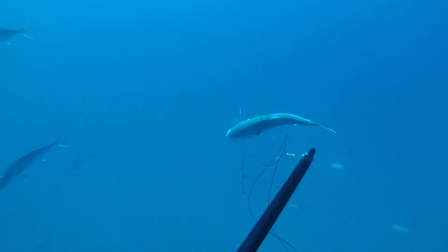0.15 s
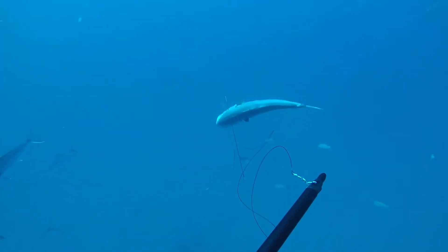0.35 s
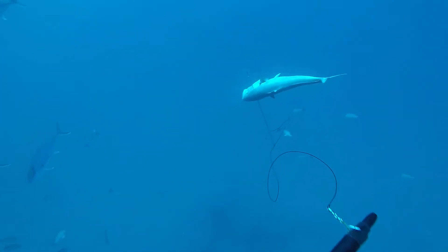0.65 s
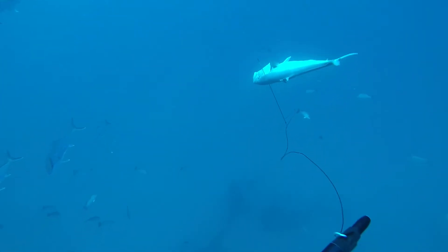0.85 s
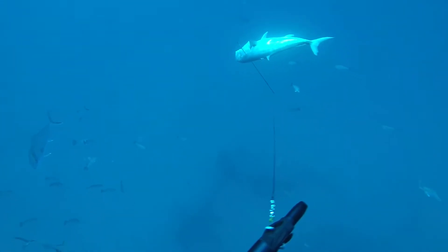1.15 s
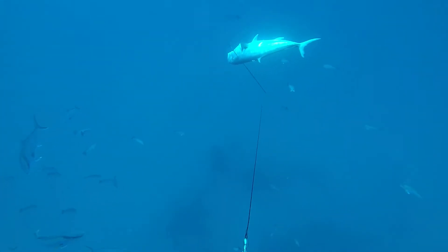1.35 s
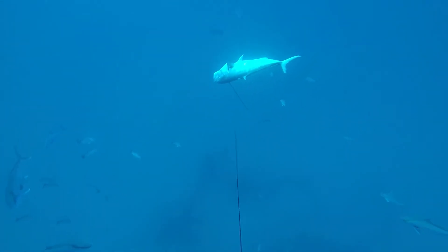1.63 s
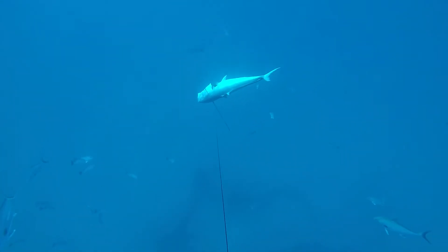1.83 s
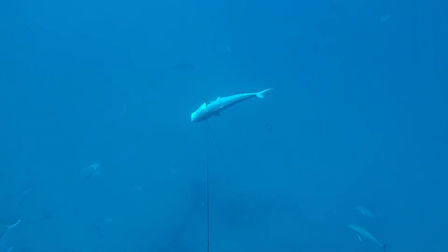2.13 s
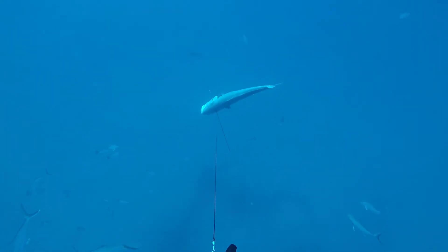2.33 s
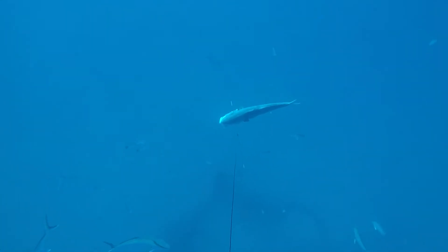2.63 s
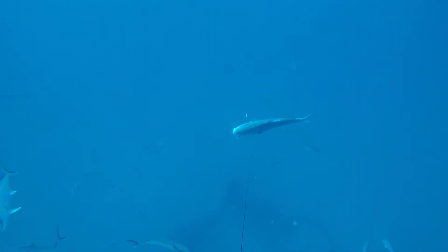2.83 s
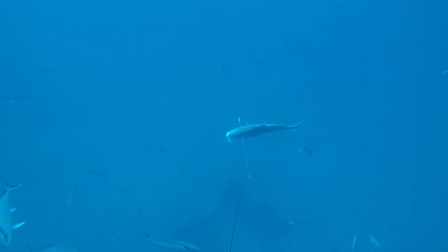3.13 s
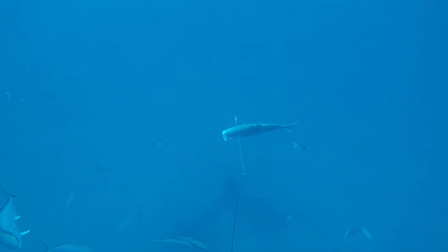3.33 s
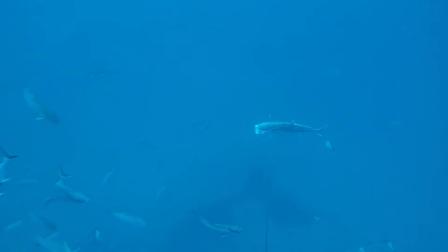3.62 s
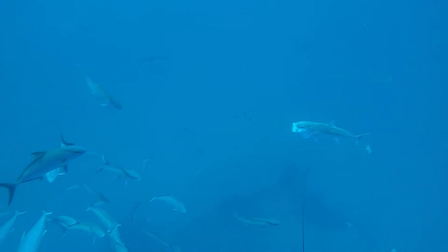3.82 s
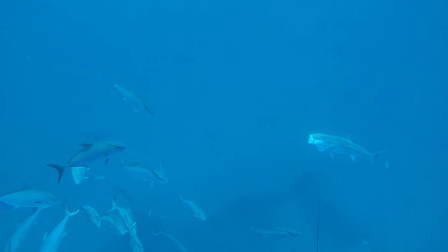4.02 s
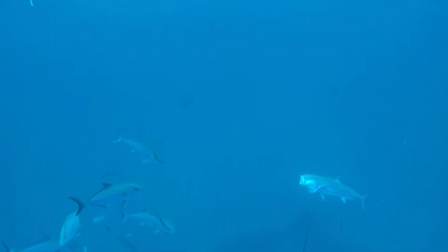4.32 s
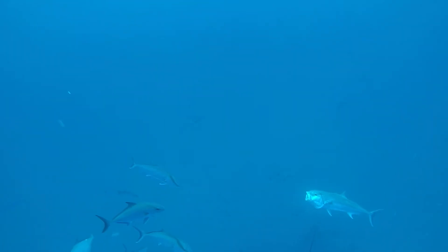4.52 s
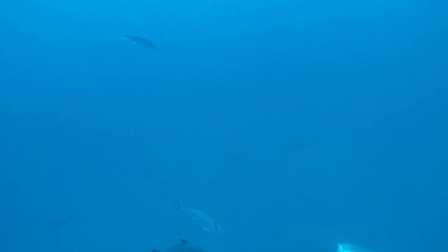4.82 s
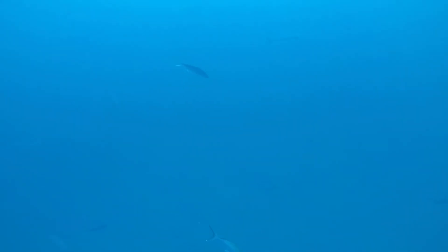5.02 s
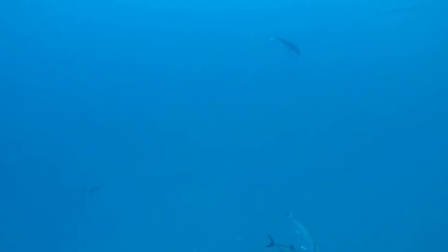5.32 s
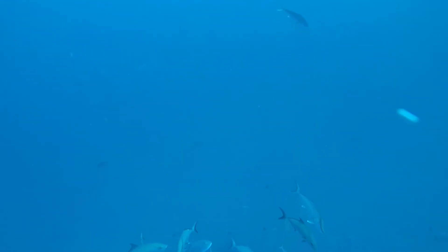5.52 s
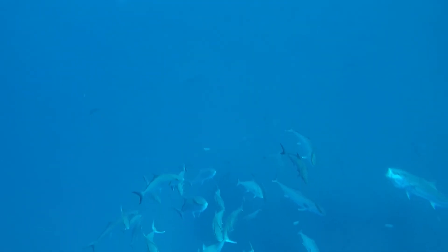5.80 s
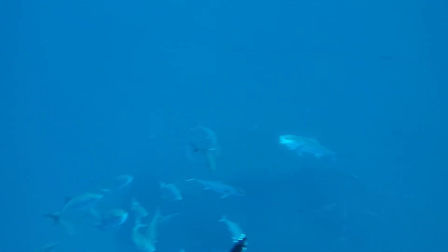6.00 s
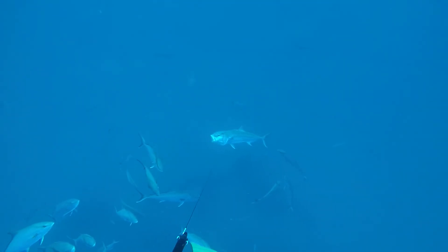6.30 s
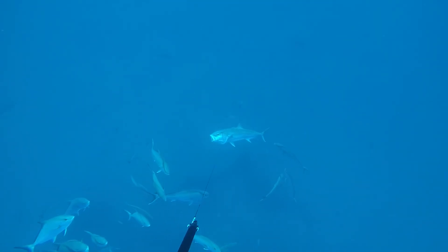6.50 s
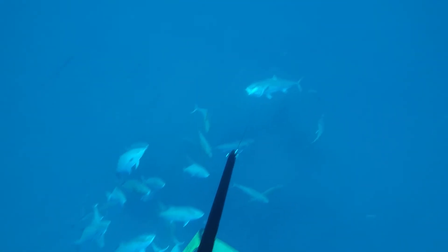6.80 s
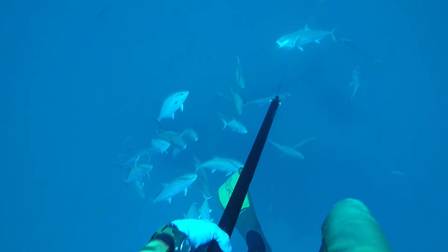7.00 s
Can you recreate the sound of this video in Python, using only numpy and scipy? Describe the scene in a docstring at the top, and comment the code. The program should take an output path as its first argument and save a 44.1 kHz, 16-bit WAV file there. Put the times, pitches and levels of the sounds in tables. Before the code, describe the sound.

Muffled open-sea sound: water hums and rumbles around a diver's sealed camera while shrimps snap, gear clacks, and close cracks ring briefly.

```python
"""Water streams past a camera's sealed housing on a swimming diver's head in open sea: it hums and rumbles.
Gusty noise drives the hum through air resonances. Noise with a fine crackle makes the sea's steady hiss.
Bubbles are rising blips; gear knocks by shaking the shell's modes, and thuds are short dull swings.
Far shrimps snap with an echo from the surface, and something cracks sharply close by.
Two microphones inside the housing hear all this with a lag and each with its own colour."""
import sys
import numpy as np
from scipy import signal
from scipy.fft import rfft, irfft
from scipy.io import wavfile
from scipy.ndimage import uniform_filter1d

SR = 44100
rng = np.random.default_rng(int(sys.argv[2]) if len(sys.argv) > 2 else 0)


def waveform_to_disk(signal):
    """Save audio, clipped to [-1, 1], as 16-bit WAV at the path in sys.argv[1]."""
    frames = np.transpose(np.atleast_2d(signal))
    scaled = np.clip(frames, -1, 1) * 32767
    samples = np.round(scaled).astype(np.int16)
    wavfile.write(sys.argv[1], SR, samples)


N = 315315

# The two microphones. Each row: frequency in Hz, relative hiss level on the right in dB,
# left minus right in dB.
MICROPHONES = [(146, -62.5, 7), (444, -67.5, -2.5), (614, -64, -2.5), (940, -59.5, -0.5), (1235, -54, -4.5),
               (1397, -69.5, 2), (1528, -59.5, -4.5), (2060, -66, -5.5), (2234, -81.5, 10.5),
               (2420, -63, -20), (2464, -74, 6), (3050, -67, -16), (3360, -79.5, 10), (3900, -73.5, -37),
               (4080, -79, 4), (4540, -77.5, -6), (5990, -74.5, 6), (6880, -80, 3), (7740, -74.5, -9),
               (8100, -81, -2), (10270, -84.5, -2), (12300, -94.5, 1.5), (13700, -99, 0), (15200, -120, 1)]
# How the left hiss differs from the right. Each row: frequency in Hz, left lead in radians,
# likeness from 0 to 1.
LEFT_TURN = [(400, -1.9, .1), (560, -1.3, .7), (780, -1.2, .75), (1000, .1, .96), (1200, .6, .94),
             (1380, .2, .2), (1600, .3, .6), (1850, .3, .4), (2000, -1.5, .4), (2170, -3.1, .1),
             (2400, -5.6, .65), (2900, -6.9, .65), (3150, -6, .7), (3600, -7.3, .55), (4000, -6, .65),
             (4350, -3.2, .15), (4600, -1.5, .4), (5100, .1, .72), (6300, 3.3, .7), (7100, 6.6, .25),
             (7800, 9.4, .5), (8300, 11.5, .1)]
# Water streaming past in surges. Each row: time in seconds, hum level in dB.
HUM_LEVEL = [(0.0, -53), (0.06, -45.5), (0.28, -54), (0.34, -35), (0.54, -40.5), (0.57, -29.5),
             (0.65, -40.5), (0.69, -33.5), (0.86, -52), (1.13, -44.5), (1.21, -36.5), (1.29, -42.5),
             (1.53, -39.5), (1.57, -26.5), (1.95, -30), (2.01, -50.5), (2.11, -55), (2.61, -33),
             (2.83, -50.5), (3.15, -30), (3.29, -41.5), (3.82, -29), (3.9, -38), (3.98, -25), (4.02, -43),
             (4.1, -53.5), (4.3, -29), (4.52, -39.5), (4.56, -28.5), (5.2, -49), (5.38, -71), (5.44, -29.5),
             (5.55, -73.5), (5.87, -19.5), (5.99, -22.5), (6.01, -28.5), (6.29, -49.5), (6.61, -33),
             (6.73, -67), (6.79, -50.5), (7.01, -63), (7.05, -35), (7.15, -74)]
# The lower hum. Each row: time in seconds, level in dB.
LOW_HUM_LEVEL = [(0.0, -48.5), (0.69, -36), (0.84, -57), (1.19, -23.5), (1.21, -36), (1.47, -42.5),
                 (1.53, -29), (1.61, -40.5), (1.67, -34), (1.71, -32), (1.93, -33), (2.11, -54),
                 (2.27, -40.5), (2.55, -41), (2.9, -43), (3.03, -28.5), (3.38, -38.5), (4.66, -30),
                 (5.4, -60), (5.44, -42), (5.5, -66), (5.93, -22.5), (6.13, -45), (6.59, -51), (6.71, -72),
                 (6.79, -46), (6.99, -70), (7.05, -58), (7.15, -67)]
# Slow pressure on the microphones. Each row: time in seconds, rumble level in dB.
RUMBLE_LEVEL = [(0.0, -45), (1.23, -52), (1.9, -56), (2.15, -60), (3.0, -64), (3.1, -45), (3.45, -39.5),
                (3.86, -45.5), (4.38, -26.5), (5.4, -44.5), (5.46, -29.5), (5.59, -44), (5.65, -28.5),
                (5.71, -33.5), (5.95, -23.5), (5.99, -38), (6.09, -21.5), (6.13, -32), (6.55, -28),
                (6.61, -29), (6.73, -39.5), (6.79, -26), (6.85, -35), (6.95, -29.5), (7.01, -36),
                (7.03, -26), (7.15, -29)]
# The sea's hiss. Each row: time in seconds, wash level (under 1330 Hz) in dB,
# fizz level (1330 to 3650 Hz) in dB.
HISS_LEVEL = [(0.0, -47, -52.5), (0.24, -45, -48.5), (0.4, -42.5, -47.5), (0.55, -43, -46),
              (0.8, -40.5, -45), (0.88, -40, -44), (0.96, -37, -40.5), (1.02, -41, -40.5), (1.1, -38, -45),
              (1.27, -39, -44.5), (1.53, -38, -46), (1.75, -39, -44), (2.61, -42, -45.5),
              (2.89, -43.5, -47), (3.17, -39.5, -45), (3.42, -44, -45.5), (3.78, -40.5, -45.5),
              (4.02, -42, -46), (4.56, -42.5, -45), (4.7, -40, -46), (4.92, -44.5, -45.5),
              (5.3, -44, -45.5), (5.69, -45, -45), (5.93, -41.5, -42), (6.11, -45.5, -46),
              (6.59, -42, -43.5), (6.885, -45, -48), (6.904, -46, -38.5), (6.925, -43.5, -45),
              (7.15, -46, -48)]
# The treble hiss swells on its own now and then, and a short scraping burst of hiss flares near 6.9 s. Each
# row: time in seconds, lift in dB.
TREBLE_LIFT = [(0, 0), (5.8, 0), (5.9, -1), (6.06, 2), (6.11, 3.5), (6.13, -0.5), (6.8, 0), (6.89, 0),
               (6.905, 8), (6.925, 5), (6.94, 1), (7.15, 1)]
# Bubbles slipping past the housing. Each row: start in seconds, level in dB, starting pitch in Hz,
# time to fade by 60 dB in seconds.
BUBBLES = [(0.151, -40, 420, 0.067), (1.815, -22, 483, 0.027), (2.054, -30.5, 780, 0.086),
           (2.834, -28, 393, 0.043), (4.607, -23, 382, 0.011), (6.08, -26, 420, 0.05),
           (6.434, -31.5, 447, 0.046), (6.834, -34, 380, 0.053)]
# Low, middle and high groups of housing shell modes. Each row of a group: typical frequency in Hz,
# typical level in dB, time to fade by 60 dB in seconds.
SHELL_MODES = [
    [(544, -15.5, 0.021), (761, 1, 0.027), (1070, -8, 0.009), (1225, -4.5, 0.013)],
    [(1360, 7, 0.0078), (1589, 5, 0.02), (1935, 1.5, 0.0079)],
    [(2370, 8, 0.0062), (3036, 12, 0.0095), (3790, 7.5, 0.0036), (4860, -1, 0.0014)],
]
# Gear scraping or tapping the shell. Each row: start in seconds, peak of the middle modes in dB,
# low modes relative to that in dB, high modes relative to that in dB.
KNOCKS = [(0.2108, -18, 7.5, -0.5), (0.2161, -16.5, -5, -22), (0.2265, -41, -12, -20),
          (0.2355, -19.5, -17, -8), (0.252, -30, -7, -20), (0.2575, -9, -28, -13), (0.2395, -26, -12, -12),
          (0.267, -28, -12, -20), (0.278, -28, -14, -20), (0.634, -34, 10, -10), (0.64, -25, -3, -2),
          (0.65, -31, 2, -15), (0.664, -36, -7, 7), (0.681, -36, -9, 6), (0.736, -35, -9, 8.5),
          (0.978, -27, -7, 1), (0.99, -27, -13, -11), (1.032, -15, 3.5, -10), (1.458, -21, 8.5, -25),
          (1.656, -38, 15, -20), (1.684, -18, -1, -11), (1.696, -23, -3, -16), (1.849, -24, 2, -28),
          (2.06, -26, 5.5, -5), (2.259, -28.5, 13.5, -3), (2.417, -27, -13, 2.5), (2.48, -21, 2, -20),
          (2.572, -27.5, 2, -31), (3.044, -10, -6.5, 0), (3.051, -21, -8, -4), (3.061, -21, -1, -18),
          (3.174, -13.5, -13, -39), (3.483, -21, -10, -30), (3.963, -23, 7.5, -26), (4.194, -22.5, -1, 3),
          (4.32, -24.5, -1, -28), (4.458, -24, -5, -39), (4.583, -20.5, -11, -45), (4.606, -23, 11, -2),
          (4.611, -19.5, -2, -1), (5.428, -24.5, 4.5, -38), (5.763, -16, 1.5, -47), (5.873, -28.5, 8, 0),
          (5.893, -25, 3, -1), (5.982, -35, -9, 8), (5.93, -23, -3, -22), (6.548, -31, -5, -13),
          (6.561, -26, 1, -7), (6.554, -27.5, 6, -18), (6.567, -20.5, -3, -13), (6.576, -24, -2, -20),
          (6.596, -25, -17, -10), (6.381, -18.5, -7, -8), (6.6007, -4, -2.5, -13.5),
          (6.6056, -19, -15, -20), (6.610, -27, -7, -24), (7.027, -30, -8, 3), (7.040, -34, -9, 5),
          (7.0463, -18, 11, -22), (7.052, -26, -14, -14), (7.0556, -13.5, 1, -13), (7.067, -28, 7, -4),
          (7.0757, -20.5, -2, -4)]
# Gear dragged across the shell, a rattle of many contacts. Each row: start in seconds, peak of the
# middle modes in dB, low and high modes relative to that in dB, length of the drag in seconds.
RATTLES = [(1.669, -20.5, 1.5, -15, .008), (5.197, -20.5, 0.5, -11, .007), (6.38, -18.5, -9, -9, .018),
           (6.584, -18, -18, -24, .004), (7.047, -11.5, -1, -13, .014)]
# Dull pressure thuds. Each row: time of the peak in seconds, right peak level in dB, settled pitch in Hz,
# rise in cycles of that pitch, left minus right in dB.
THUDS = [(0.215, -25.5, 237, 0.76, -22), (1.037, -15.5, 176, 0.35, -5), (1.144, -15.5, 173, 1.48, -27),
         (1.153, -28, 177, 1.14, -17), (1.18, -14.5, 182, 1.05, -24), (1.6604, -8.5, 163, 1.2, -8),
         (1.811, -19, 158, 1.27, -12), (3.969, -7, 161, .7, -1), (4.462, -4, 160, .7, -1.5),
         (5.435, -7, 156, .65, .1), (4.347, -15, 69, 0.34, 1), (4.689, -15.5, 53.6, 0.4, -18),
         (4.745, -22.5, 61.5, 0.3, 15), (5.636, -10.5, 63, 0.31, -1), (5.668, -14.5, 75, 0.32, 2),
         (5.769, -8, 212, 0.88, -9), (5.883, -39, 67, .36, -40), (6.386, -15, 234, 0.66, -5),
         (6.564, -11, 93, 0.49, 1.1), (6.607, -6.5, 69, 0.48, 3.5), (6.786, -10, 107, 0.23, -2.5),
         (6.808, -26, 133, 0.33, -7), (6.838, -14.5, 288, 0.52, -5), (6.935, -7, 43, 0.32, 4),
         (7.054, -16.5, 245, 1.17, -3), (7.081, -21, 59, 0.17, -7)]
# Shrimp snaps, and at 4.769 s the surface echo of the third crack, sounded like a snap. Each row: start in
# seconds, peak midway between the sides in dB, left minus right in dB, extra for the lowest ring in dB, extra
# for the highest rings in dB, surface echo relative to the snap in dB.
SNAPS = [(0.4685, -23.5, 8, -8, 10, -14), (0.516, -22.5, -3, -3, -5, -1), (0.6343, -14, -3.5, 3, -15, -19),
         (0.757, -31, 0, -9, 3, -7), (1.0331, -24.5, 1, 7, -11, -11), (1.255, -19, -2, -8, 12, -2),
         (1.3174, -26.5, 8, -14, -4, -10), (1.5742, -17.5, -6, -9, -14, -8), (1.684, -27, 3, -9, -9, -15),
         (1.883, -24.5, 6, -20, -14, -24), (1.9673, -31, 15, -12, -8, -19), (2.3525, -31, 1.1, -9, -8, -8),
         (2.4833, -9.5, 4.5, -4, 7.5, -8.5), (2.553, -17, -3, -14, 15, -3), (2.6938, -19, -2, -20, 12, -7),
         (2.833, -24.5, -1, 1, 1, -9), (2.8865, -14.5, -2, -16, 6, -9), (2.9012, -27, 0, -3, -6, -15),
         (2.9233, -12.5, -4.5, 5.5, 2.5, -8.5), (3.188, -30, -2, -9, 0, -11), (3.2, -16, 3, 7.5, 8, -23),
         (3.2645, -24.5, 0, -9, 0, -15), (3.256, -22.5, -5, 8, 12, -13), (3.2888, -20.5, -4.5, -6, -3, -9),
         (3.352, -25, -1, -11, 3, -15), (3.866, -23, -1, -6.5, -1.5, -2), (4.226, -27, -9, -9, 6, -10),
         (4.6052, -23, -5, 1.5, -8, -7), (4.648, -20.5, -2, -5, 7, -12), (4.769, -31, 0, -19, -14, -19),
         (5.2763, -18, -4, -8, 11, -6.5), (5.401, -8, -8, -8, -14, -4.5), (5.464, -25, 2, -21, -9, -7),
         (6.163, -29, -5, -13, 8, -16), (6.205, -24, 4, -11, 17, -11), (6.869, -23.5, -6, 6, -2, -14),
         (6.93, -18, -7, -12, -16, -17), (7.007, -21, -9, -5, -4, 6.5), (7.084, -21.5, -2, -5, 16, -16)]
# Rings of the microphone cavities. Each row: frequency in Hz, typical level in dB,
# time to fade by 60 dB in seconds.
CAVITY_RINGS = [(3170, 17.5, 0.0048), (6360, 21, 0.0015), (7270, 2, 0.0074), (8500, 10, 0.0027),
                (10650, 4.5, 0.0011), (12600, 6.5, 0.0028), (14700, 3.5, 0.0012)]
# Sharp cracks. Each row: start in seconds, settled ring pitch in Hz, time to fade by 60 dB in seconds,
# how far below that pitch it starts as a share, right and left ring level in dB, overtone relative
# to the ring in dB, tick frequency in Hz, tick upper limit in Hz, right and left tick level in dB.
CRACKS = [(4.7010, 1403, 0.033, 0.044, 1.5, -3, -14, 5420, 8400, -12.5, -6.5),
          (4.7307, 1906, 0.032, 0.23, 1.5, -5.5, -12, 3660, 5540, -15, -10),
          (4.7405, 1720, 0.019, 0.13, -3.5, -11, -9.5, 5900, 6860, -23, -14.5)]

LEFT_LAG_S = 22 / SR
HUM, LOW_HUM, HIGH_HUM = (288.6, 21.1), (151, 41), (446, 33)  # air modes: Hz, width in Hz
HIGH_HUM_DB = -22  # the weak third air mode, relative to the hum
TREBLE_DB = -8.5  # hiss over 3650 Hz relative to the fizz, before its own lift
CONTACT_S, CONTACTS_PER_S = 0.0029, 1500  # length of a touch; average contact rate in a rattle
LOW_LEAD = 0.96  # extra left lead of the low shell modes, radians
THUD_LEAD = -2.45  # left lead in radians: nearly opposed in the two microphones
START_DEPTH_M, ASCENT_M_S, SOUND_M_S = 17.6, .56, 1500
ECHO_PAN_DB, ECHO_TOP_HZ = 4.5, 8300  # left minus right of the echo from overhead; its upper limit
FORERUNNER_S, FORERUNNER_DB = 0.00189, -19  # faint tick as the claw shuts: time ahead, noise strength
OVERTONE_HZ, OVERTONE_S = 2930, 0.0021  # a rough upper ring of the cracking cavity; its decay time
TOP_HZ = 16400  # upper limit of the recorder


def undb(db):
    """Turn decibels into a plain factor."""
    return 10 ** (np.asarray(db) / 20)


def unit(x):
    """Scale to an average (RMS) strength of 1."""
    return x / np.sqrt(np.mean(x ** 2))


def peak(x):
    """Scale so the largest swing is 1."""
    return x / np.abs(x).max()


def band(x, hz, width):
    """Two-pole resonance: strengthen one pitch, width in Hz."""
    return signal.lfilter(*signal.iirpeak(hz, hz / width, SR), x)


def sieve(x, order, hz, kind):
    """Butterworth filter: 'low', 'high' or 'band' says what passes."""
    return signal.sosfilt(signal.butter(order, hz, kind, fs=SR, output="sos"), x)


def ring(x, modes):
    """Sum of decaying modes struck by x."""
    out = 0
    for hz, db, t60 in modes:
        pole = np.exp(2j * np.pi * hz / SR - np.log(1000) / (t60 * SR))
        out = out + undb(db) * signal.lfilter([1], [1, -pole], x).imag
    return out


def walk(rate):
    """Random levels held for 1 / rate seconds and smoothed twice, with an RMS of 1."""
    hold = int(SR / rate)
    steps = np.repeat(rng.standard_normal(N // hold + 1), hold)
    smooth = uniform_filter1d(uniform_filter1d(steps, hold), hold)
    return unit(smooth[:N])


def add(out, s, x):
    """Mix x into out from time s."""
    i = int(s * SR)
    out[..., i:i + x.shape[-1]] += x[..., :N - i]


def clock(seconds):
    """Time in seconds at every sample of a short sound."""
    return np.arange(int(seconds * SR)) / SR


def frequencies():
    """Every frequency of the full-length spectrum, in Hz."""
    return np.arange(N // 2 + 1) * SR / N


def curves(table):
    """Columns of a time table at every sample."""
    s, *columns = np.transpose(table)
    return [np.interp(np.arange(N) / SR, s, column) for column in columns]


def microphone_colour():
    """Hiss level, left minus right, left lead and likeness at every frequency."""
    at = np.log(frequencies() + 1)
    colour = []
    for table in (MICROPHONES, LEFT_TURN):
        hz, *columns = np.transpose(table)
        colour += [np.interp(at, np.log(hz), column) for column in columns]
    return colour


def pair(x, lead, left_db, alike=1, other=0):
    """Left and right: the left is late, turned in phase and partly unrelated."""
    alike = np.clip(alike, 0, 1)
    left = alike * rfft(x) + np.sqrt(1 - alike ** 2) * rfft(other + 0 * x)
    turn = np.exp(1j * (lead - 2 * np.pi * frequencies() * LEFT_LAG_S))
    return np.array([irfft(left * undb(left_db) * turn, N), x])


def steady(x, share):
    """Partly even out the slow swings in strength, so the hum sounds steadier."""
    power = uniform_filter1d(x ** 2, int(.09 * SR)) + 1e-12
    return unit(x / power ** (share / 2))


def eddies(rate, patchy_db):
    """Swirling water as noise whose strength wanders in gusts."""
    return rng.standard_normal(N) * undb(patchy_db * walk(rate))


def hum(hum_db):
    """The main air mode, evened out, plus a weak higher one."""
    main = steady(band(band(eddies(25, 2.9), *HUM), HUM[0], 62.6), 0.81)
    high = unit(band(band(eddies(25, 5.3), *HIGH_HUM), *HIGH_HUM))
    return (main + undb(HIGH_HUM_DB) * high) * undb(hum_db)


def low_hum(low_db):
    """The lowest air mode, cut steeply at the bottom."""
    tone = band(band(eddies(25, 2.5), *LOW_HUM), 227.0, 95)
    return unit(sieve(tone, 10, 130, "high")) * undb(low_db)


def rumble(rumble_db):
    """Slow eddies push on a microphone."""
    return unit(sieve(eddies(12, 3), 2, [22, 85], "band")) * undb(rumble_db)


def stream(hum_db, low_db, rumble_db):
    """Eddies in gusts drive the air modes; slow ones push the two microphones mostly separately."""
    hums = pair(hum(hum_db), 0.28, 3.75, 0.98, hum(hum_db))
    lows = pair(low_hum(low_db), 0.027, 0.082, 0.96, low_hum(low_db))
    push = pair(rumble(rumble_db), -2.48, 1.7, 0.13, rumble(rumble_db))
    return hums + lows + push


def hiss(wash_db, fizz_db, treble_db):
    """Wash, fizz and treble swell apart; a crackle of countless faint far snaps runs through them."""
    colour_db, left_db, lead, alike = microphone_colour()
    hz, both = frequencies(), np.zeros((2, N))
    struck = rng.random((2, N)) < 400 / SR  # about 400 faint snaps a second
    strength_db = np.minimum(3 * rng.exponential(size=(2, N)), 8)
    crackle = rfft(unit(struck * rng.standard_normal((2, N)) * undb(strength_db)))
    noise = rfft(rng.standard_normal((2, N)))
    # lower and upper Hz, level, share of crackle, patchiness in dB
    parts = [(125, 1330, wash_db, .55, 2.0), (1330, 3650, fizz_db, .6, 1.4), (3650, SR, treble_db, .55, 1.2)]
    for lo, hi, level_db, grit, patchy_db in parts:
        part = irfft((noise + grit * crackle) * undb(colour_db) * (hz >= lo) * (hz < hi), N)
        both += unit(part) * undb(level_db + patchy_db * walk(40) + 0.7 * walk(9))
    return pair(both[0], lead, left_db, alike, both[1])


def bubbles():
    """Short rounded blips that rise in pitch."""
    out, t = np.zeros(N), clock(.08)
    for s, db, hz, t60 in BUBBLES:
        fade = 1000 ** (-t / t60) * (1 - np.exp(-t / 0.001))
        add(out, s, undb(db) * np.sin(2 * np.pi * hz * t * (1 + 3.0 * t)) * fade)
    return pair(out, 0.27, 0.78)


def strike_spot(push, modes):
    """Every spot on the shell shifts the modes a little and favours others."""
    shifted = [(hz * (1 + .025 * rng.standard_normal()), db + 2 * rng.standard_normal(), t60)
               for hz, db, t60 in modes]
    return ring(push, shifted)


def knocks():
    """Each contact is a short, rough, rounded push into the shell modes, which it excites unevenly."""
    out, t = np.zeros((3, N)), clock(.04)
    for s, db, low_db, high_db, drag_s in [(*row, 0) for row in KNOCKS] + RATTLES:
        push = rng.standard_normal(len(t)) * np.exp(-(t / CONTACT_S) ** 2) * (1 - np.exp(-t / 0.00058))
        push[20] += 14.0  # one firm touch near the start
        contacts = (rng.random(len(t)) < CONTACTS_PER_S / SR) * (t < drag_s)
        push += 23.0 * rng.standard_normal(len(t)) * contacts
        low, mid, high = (strike_spot(push, modes) for modes in SHELL_MODES)
        mid = band(mid, 1520, 970)  # the middle modes take a swing or two to build
        low, mid, high = peak(low) * undb(db + low_db), peak(mid) * undb(db), peak(high) * undb(db + high_db)
        # right, then the in-phase and quarter-turned parts of the left
        lows = np.array([low, low * np.cos(LOW_LEAD), low * np.sin(LOW_LEAD)])
        add(out, s, lows + np.outer([1, 1, 0], mid + high))
    right, in_phase, quarter = sieve(out, 3, [330, 7000], "band")  # the knocks stay between 330 Hz and 7 kHz
    _, left_db, lead, _ = microphone_colour()
    left = pair(in_phase, lead, left_db)[0] + pair(quarter, lead + np.pi / 2, left_db)[0]
    return np.array([left, right])


def thuds():
    """A swing that starts quick, slows down, builds over its rise time and dies away."""
    out, t = np.zeros((2, N)), clock(.15)
    for s, db, hz, cycles, left_db in THUDS:
        rise = cycles / hz
        swell = undb(db) * (t / rise * np.exp(1 - t / rise)) ** 1.74
        turns = hz * (t + 0.57 * rise * (1 - np.exp(-t / (0.41 * rise))))
        swing = np.sin(2 * np.pi * turns + np.array([[THUD_LEAD], [0]]))
        both = swell * swing * undb([[left_db], [0]])
        add(out, s - rise, sieve(both, 2, .45 * hz, "high"))
    return out


def snaps():
    """A forerunner, then a collapsing bubble rings each cavity; its echo comes sooner as the diver rises."""
    out, t = np.zeros((2, 2, N)), clock(0.033) - .002
    before = .03 + undb(FORERUNNER_DB) * np.exp(-((t + FORERUNNER_S) / .0002) ** 2)
    after = .4 * np.exp(-t / .0001) + .14 * np.exp(-t / .002)  # a short rattle
    shape = np.where(t < 0, before, after)
    echoes = [(s + 2 * (START_DEPTH_M - ASCENT_M_S * s) / SOUND_M_S, db + echo_db, ECHO_PAN_DB,
               low_db - 5, top_db, 0) for s, db, _, low_db, top_db, echo_db in SNAPS]
    for path, rows in enumerate((SNAPS, echoes)):
        for s, db, pan_db, low_db, top_db, _ in rows:
            click = rng.standard_normal(len(t)) * shape * (1 + path)  # the rippled surface smears the echo
            click[np.searchsorted(t, 0)] += 1.6  # the collapse itself
            extra_db = (low_db, 0, 0, top_db / 2, top_db, top_db, top_db)
            for side, sign in enumerate((1, -1)):  # left, right
                rings = [(hz, ring_db + own_db + 2.5 * rng.standard_normal(), t60)
                         for (hz, ring_db, t60), own_db in zip(CAVITY_RINGS, extra_db)]
                x = peak(ring(click, rings)) * undb(db + sign * pan_db / 2)
                add(out[path, side], s + t[0] + LEFT_LAG_S * (1 - side), x)
    both = out[0] + sieve(out[1], 2, ECHO_TOP_HZ, "low")  # the echo is duller
    return sieve(both, 4, [2100, 11200], "band")


def cracks():
    """A small cavity swings hard for a few cycles, rings on unevenly and slides up; a bright tick starts it."""
    out, t = np.zeros((2, N)), clock(.06)
    for s, hz, t60, rise, right_db, left_db, over_db, tick_hz, top_hz, tick_right_db, tick_left_db in CRACKS:
        uneven = 1 + .35 * np.cos(2 * np.pi * 240 * t + 2 * np.pi * rng.random())  # two close modes beat
        fade = np.exp(-(t / .0025) ** 2) + .3 * uneven * 1000 ** (-t / t60)
        swing = fade * (1 - np.exp(-t / .0008))
        slide = t - rise * .003 * (1 - np.exp(-t / .003))
        rough = rng.standard_normal(len(t)) * np.exp(-t / OVERTONE_S) * (1 - np.exp(-t / 0.00028))
        for width in (820, 1500, 2500):
            rough = band(rough, OVERTONE_HZ, width)
        tone = -np.sin(2 * np.pi * hz * slide) * swing + peak(rough) * undb(over_db)
        burst = rng.standard_normal(len(t)) * (np.exp(-t / .0005) + .04 * np.exp(-t / .002))
        bright = band(band(burst, tick_hz, 710), tick_hz, 3000)
        tick = peak(sieve(bright, 7, top_hz, "low"))
        add(out[1], s, tone * undb(right_db) + tick * undb(tick_right_db))
        add(out[0], s + LEFT_LAG_S, tone * undb(left_db))
        add(out[0], s, tick * undb(tick_left_db))
    return out


def scene():
    """Add up all the sounds, left and right."""
    (hum_db,), (low_db,), (rumble_db,) = (curves(c) for c in (HUM_LEVEL, LOW_HUM_LEVEL, RUMBLE_LEVEL))
    wash_db, fizz_db = curves(HISS_LEVEL)
    treble_db = fizz_db + TREBLE_DB + curves(TREBLE_LIFT)[0]
    water = stream(hum_db, low_db, rumble_db) + hiss(wash_db, fizz_db, treble_db)
    return water + bubbles() + knocks() + thuds() + snaps() + cracks()


def follow(x, release_s):
    """Peak level that jumps up and sinks exponentially."""
    ramp = np.arange(len(x)) / SR / release_s
    return np.exp(np.maximum.accumulate(np.log(x + 1e-9) + ramp) - ramp)


def record(dry):
    """Gain control ducks a moment after a sharp loud peak; the recorder rounds the peaks and cuts the top."""
    sharp = np.abs(sieve(dry, 2, 900, "high")).max(axis=0)
    gain = np.maximum(follow(sharp, 0.14) / undb(-9.0), 1) ** -.6
    gain = uniform_filter1d(np.roll(gain, int(0.0049 * SR)), int(0.0069 * SR))  # delayed, then smoothed
    rounded = np.tanh(.6 * gain * dry) / .6
    return signal.sosfilt(signal.ellip(8, .2, 70, TOP_HZ, fs=SR, output="sos"), rounded)


dry = scene()
out = record(dry)
waveform_to_disk(out)
```